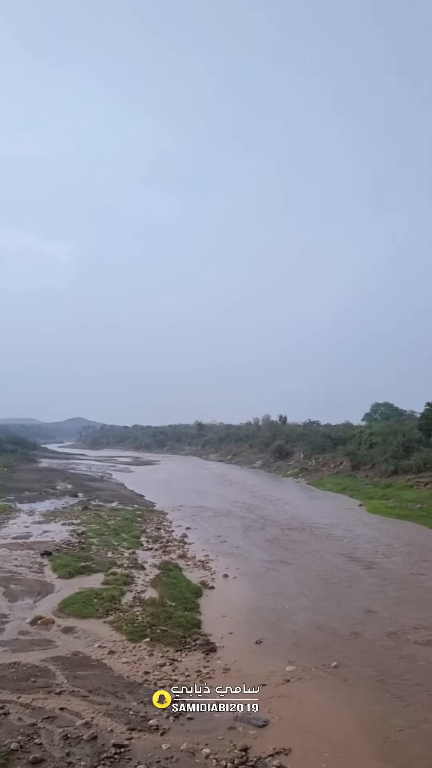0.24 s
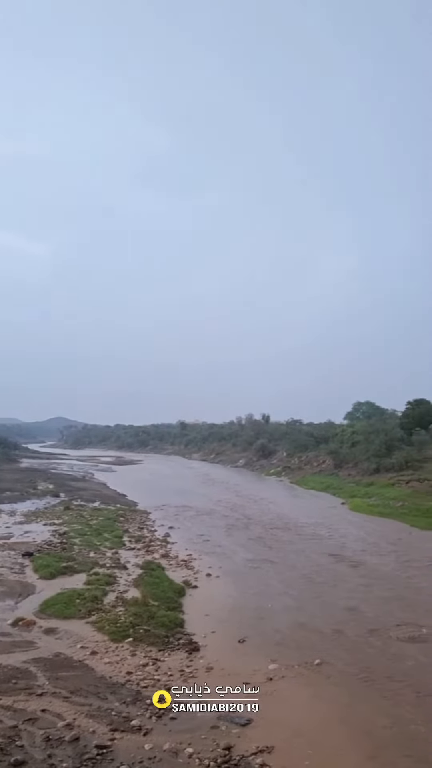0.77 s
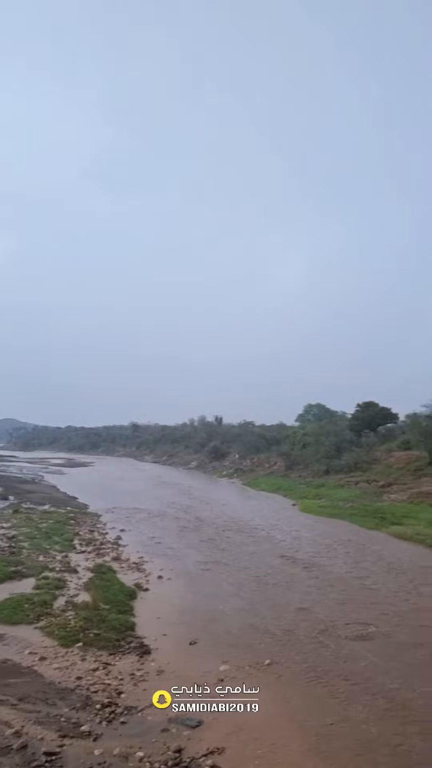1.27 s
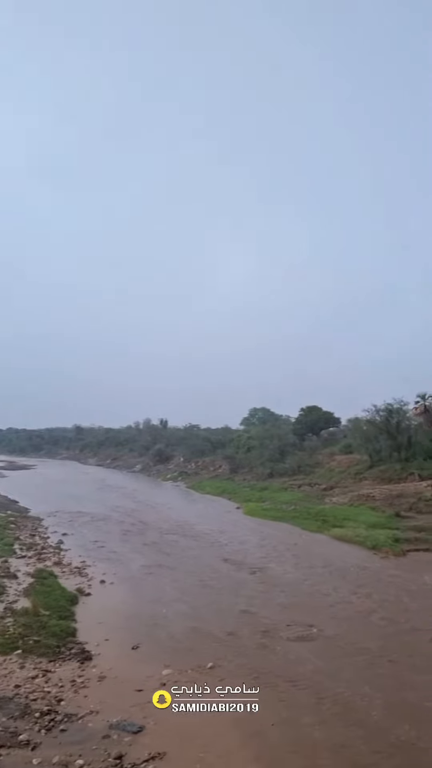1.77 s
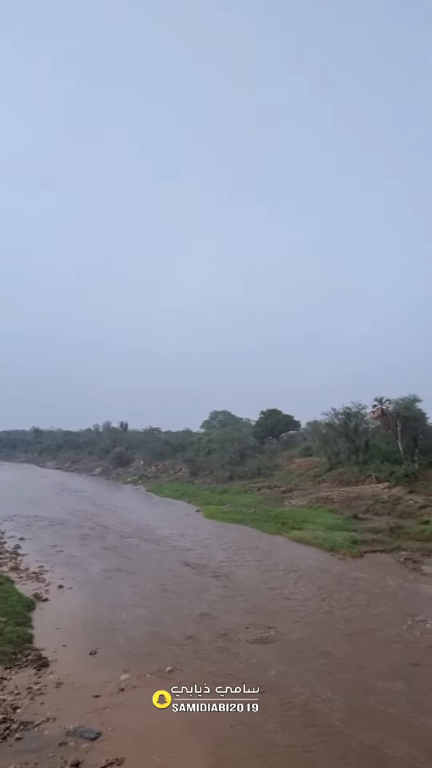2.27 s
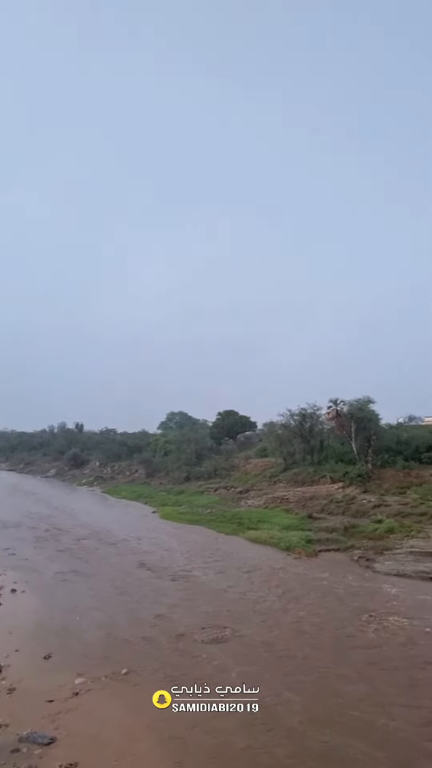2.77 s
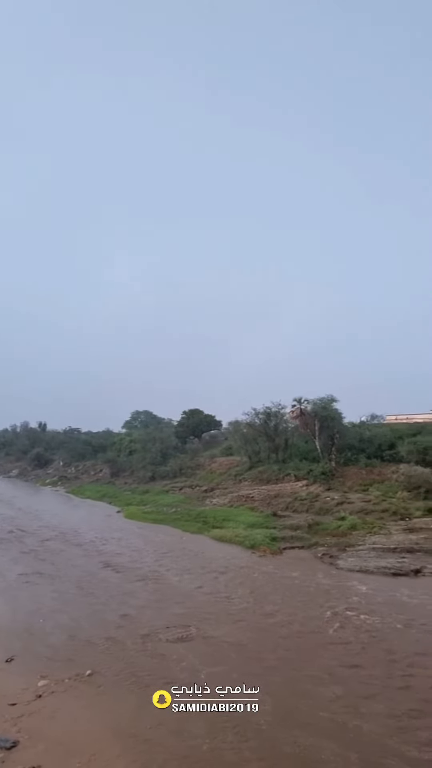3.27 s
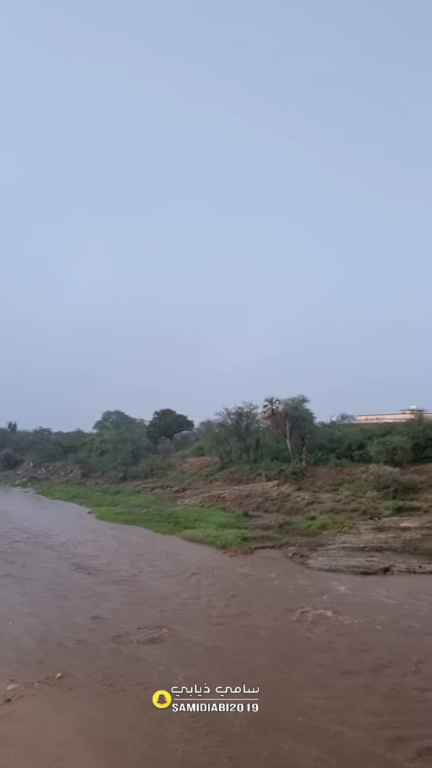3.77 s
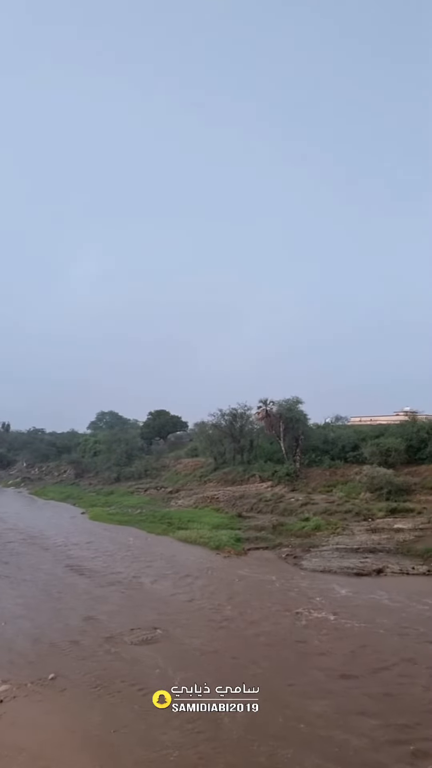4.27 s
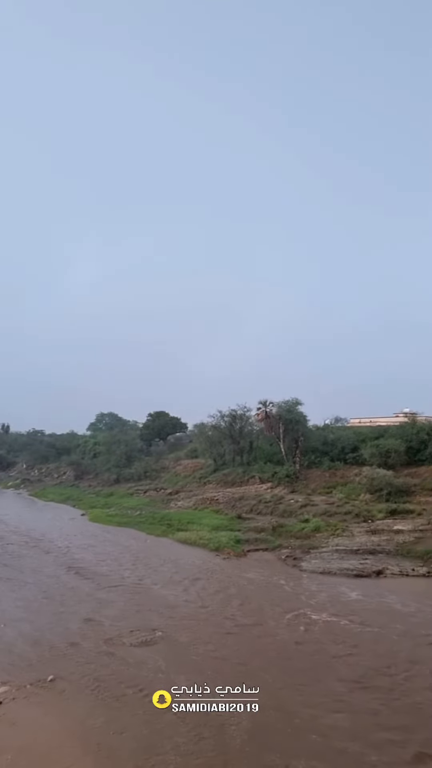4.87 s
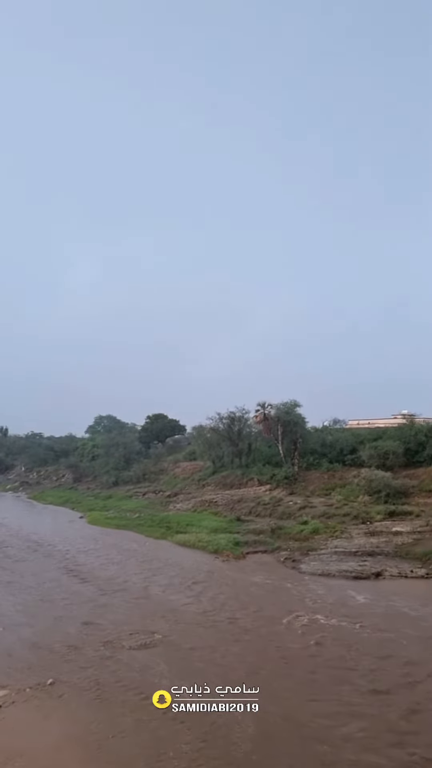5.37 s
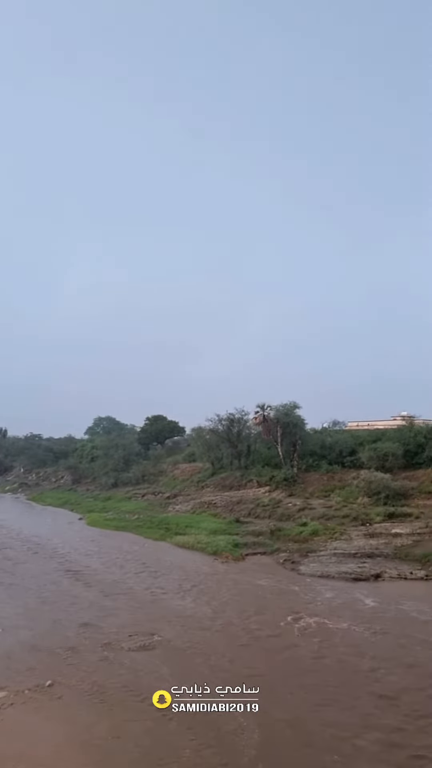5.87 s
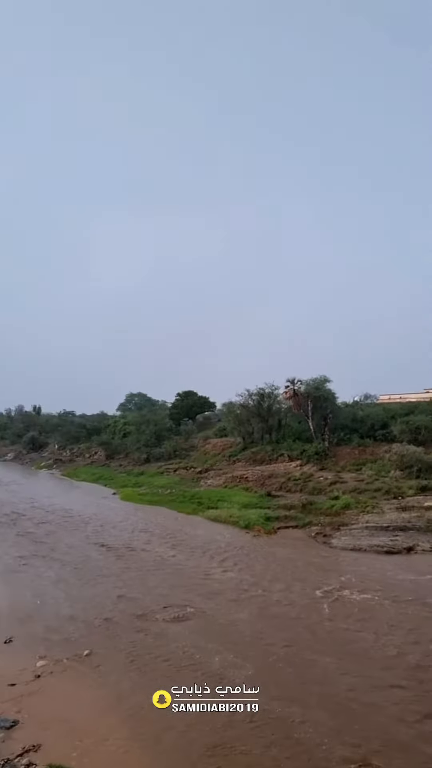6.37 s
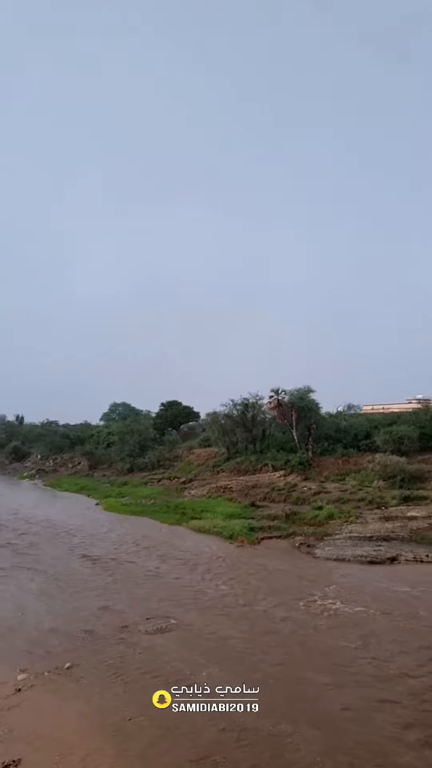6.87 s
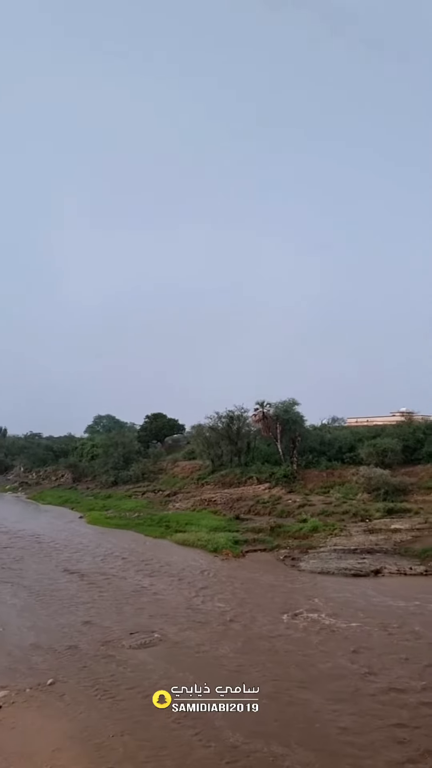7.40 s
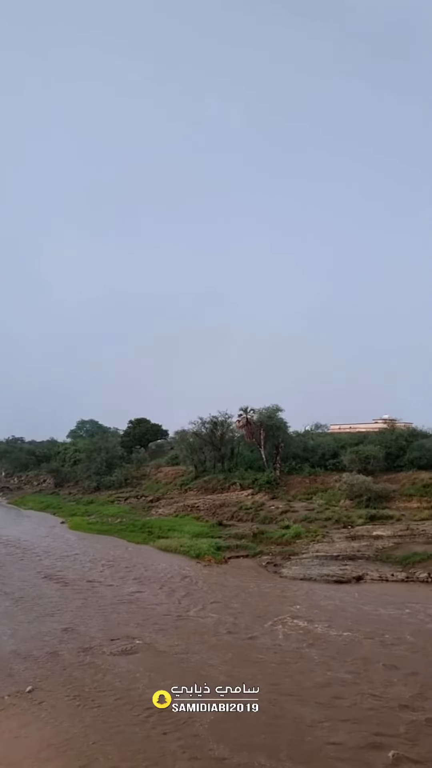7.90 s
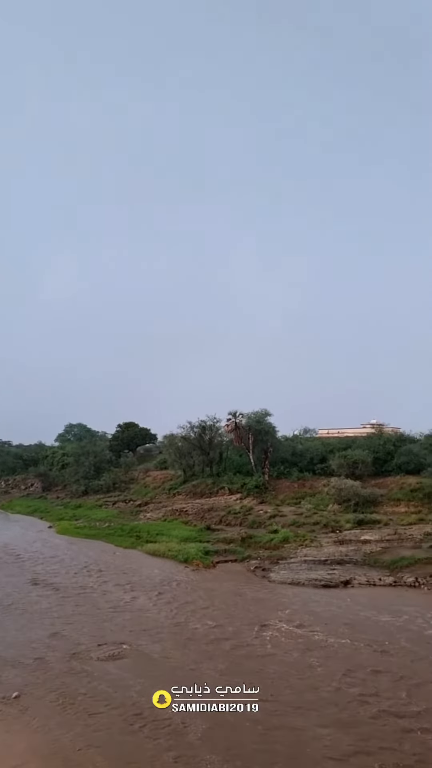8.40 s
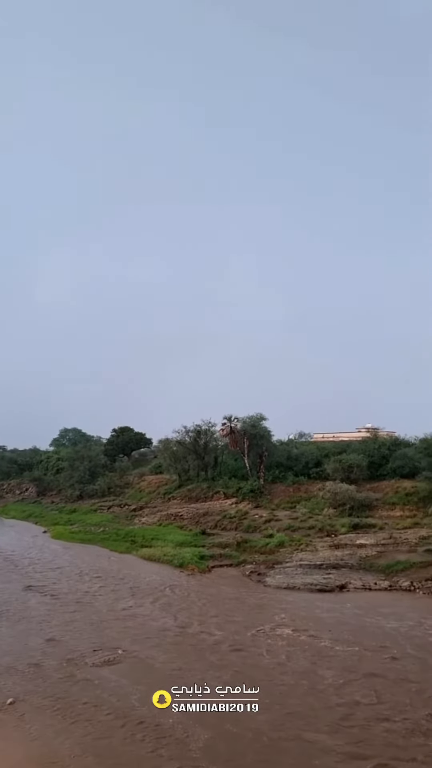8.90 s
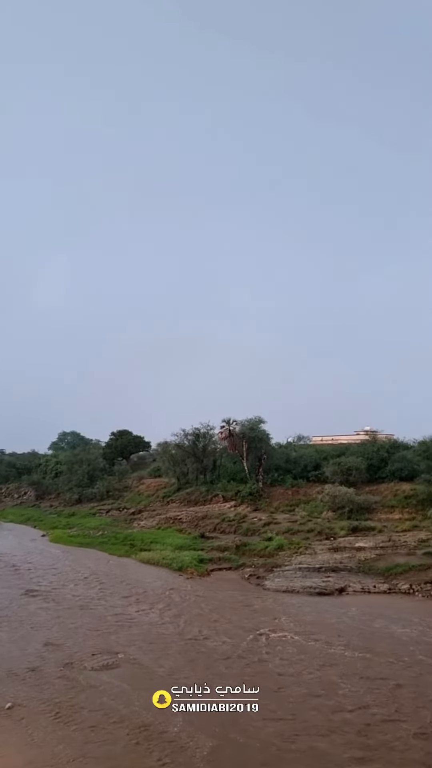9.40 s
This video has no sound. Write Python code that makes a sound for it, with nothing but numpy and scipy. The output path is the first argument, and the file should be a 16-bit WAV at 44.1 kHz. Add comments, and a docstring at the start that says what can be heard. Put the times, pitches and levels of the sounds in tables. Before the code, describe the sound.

Outdoors by a river valley, with a stereo handheld microphone. Light rain hisses softly throughout, with a few close drops ticking. Thunder starts at once as a sharp, uneven tearing crackle. A half-second car horn sounds thinly at about two and a half seconds, then a huge low clap breaks and heavy peals tumble for several seconds. After a small click the thunder drops to a muffled, wavering roll that continues to the end.

```python
"""Thunder over a river valley, at two microphone ports: a tearing crackle, then heavy peals and a long dull roll.
The bent lightning channel sends a dense, uneven train of shock waves; filters give their lengths, and
decaying noise the echoes of the valley sides. Light rain is filtered noise with a fine patter, a few
near drops are decaying sines, and a car horn is a sum of upper partials with rattle and rasp.
One bare click comes late, and the roll changes level and colour there."""
import sys
import numpy as np
from scipy import signal
from scipy.fft import rfft, irfft, next_fast_len
from scipy.io import wavfile
from scipy.ndimage import uniform_filter1d

SR = 44100
rng = np.random.default_rng(int(sys.argv[2]) if len(sys.argv) > 2 else 0)


def log_audio(samples):
    """Write samples as a 16-bit WAV file to the path given in sys.argv[1]."""
    # one column per channel
    frames = np.atleast_2d(samples).T
    # limit to full scale, then quantise
    limited = np.clip(frames, -1, 1)
    pcm = np.round(limited * 32767).astype(np.int16)
    wavfile.write(sys.argv[1], SR, pcm)


N = 425551

# In every spectrum below, levels are relative: only the shape counts, unless noted.

# light rain: f/Hz, level/dB
RAIN_SPECTRUM = [(300, -4.5), (700, -3.5), (1700, -10.5), (2300, -11), (3700, -20.5), (7300, -28),
                 (10600, -36), (13000, -35), (15700, -33.5)]
# loudness of the rain, before its slow fluctuation: t/s, level/dB
RAIN_LEVEL = [(0, -44), (2.4, -44.5), (3.0, -43), (3.4, -51), (4.84, -50), (5.7, -47.5), (9.65, -47.5)]

# near drops: t/s, nominal level/dB, f/Hz, left-right level/dB, cycles to -60 dB
DROPS = [(.354, -20, 6950, -21, 5.8), (2.0542, -42, 6000, 3, 3), (2.2243, -34, 6000, -3, 3),
         (5.1657, -50.5, 8350, -10, 4.5), (6.0514, -29, 6000, 3, 8), (6.142, -40, 5000, -14, 4),
         (6.212, -48, 3770, 9, 53), (6.934, -33, 5400, 1, 4), (7.31, -28, 2100, 0, 6.7),
         (7.945, -45, 4300, 0, 27), (8.201, -34, 2500, 2, 16), (8.636, -47, 8500, -17, 25),
         (8.824, -19, 9000, 5, 5.6), (8.826, -43, 10500, 3, 150)]
DROP_BUILD_S = 0.00023
# the click, a jump that settles exponentially: t/s, jump level/dB, time constant/s
CLICK = (6.0474, -22, .0012)

# horn partials, the low disc's first: relative level/dB, left-right level/dB
HORN_PARTIALS = [(-61, -4), (-45, 2.5), (-41, -10), (-54.5, 7), (-51.5, 4.5), (-55, 7), (-75, 11.5),
                 (-65, 6.5), (-78, -3), (-58, 0), (-65, 0), (-66, 0), (-55.5, 9.5), (-61, 10), (-50.5, -3),
                 (-67.5, -6), (-81, 5), (-60, -1), (-77, -3)]
# which harmonics of the low disc sound: multiple of its fundamental
LOW_DISC_MULTIPLES = [7, 8, 9, 10, 11, 12, 22, 24, 32]
# pitch of the low disc, which sags and recovers: t/s, f/Hz of its 8th partial
LOW_DISC_PITCH = [(2.49, 2566), (2.62, 2559), (2.86, 2558), (3.03, 2568)]
# horn partials of steady pitch, from the higher discs and some of the highest tones: f/Hz
STEADY_PARTIALS_HZ = [2315, 2701, 2766, 3087, 3152, 3472, 7331, 8625, 13730, 15332]
# the partial that fades early as the button lifts: f/Hz, t/s at which its fade starts
EARLY_FADING_PARTIAL = (3838, 2.965)
# buzz of the horn discs: f/Hz, level/dB
RATTLE_SPECTRUM = [(3500, -39.5), (5400, -19.5), (7500, -1.5), (9300, -15.5), (11500, -7), (13700, -8.5),
                   (15800, -6)]
# rasp around the loosest partial, growing and then receding: t/s, relative level/dB
RASP_LEVEL = [(2.5, -67), (2.75, -54), (2.9, -45), (3.0, -54)]
# colour of the rasp: f/Hz, level/dB
RASP_SPECTRUM = [(2450, -24.5), (2750, -8.5), (2890, -1.5), (3050, -7), (3400, -35)]
HORN_ON_S, HORN_OFF_S, HORN_ATTACK_S, HORN_RELEASE_S = 2.474, 3.022, .018, .045
HORN_LAG_S, HORN_TOP_LAG_S = 0.000485, 0.000469   # of the left port; above 9 kHz by another path
HORN_FLUTTER_DB, HORN_FLUTTER_DB_PER_KHZ = 0.5, 0.44
HORN_ECHO_DB, HORN_ECHO_T60_S = -17, 0.25
RATTLE_GROWS_DB, RATTLE_SHARED = 6, .6   # over the blast; gain of the noise common to both ports

# base level of the roll, before and after the click: t/s, deep level/dB, boom level/dB,
# peal level/dB, crackle level/dB
ROLL = [
    [(0, -42, -43.5, -47.5, -51), (.25, -48, -50.5, -49, -56.5), (.6, -44, -49, -43, -38),
     (.9, -46, -46.5, -46.5, -39.5), (1.3, -47.5, -42.5, -42.5, -36), (1.8, -42, -49.5, -44, -45.5),
     (2.3, -51, -36.5, -40, -41.5), (2.65, -43, -38, -44.5, -36), (2.9, -38, -28.5, -39, -56),
     (3.138, -52, -29.5, -43.5, -47), (3.155, -26.5, -14, -22.5, -42.5), (3.6, -26, -21, -27, -47.5),
     (4.3, -21.5, -16.5, -25.5, -43), (5.0, -20.5, -21, -25.5, -53), (5.5, -27, -27, -29.5, -59),
     (6.044, -29.5, -26, -28.5, -67)],
    [(6.048, -32, -32.5, -44.5, -76), (7.0, -33, -26.5, -38.5, -53), (7.5, -36.5, -28, -42.5, -50),
     (7.7, -33, -31.5, -42, -63), (8.0, -38.5, -29.5, -42, -64), (8.4, -32.5, -33.5, -41.5, -64),
     (9.0, -35.5, -26, -39.5, -84), (9.65, -29, -26.5, -39.5, -66)],
]
# swells, as a stretch of the channel faces the listener; negative lifts have no effect:
# t/s of the top, lift level/dB, lift of the crackle level/dB, rise t/s, fall t/s
SWELLS = [(.3, 23, 27.5, 0.22, 0.24), (0.673, 19, 7.5, 0.027, 0.43), (.81, 21, 8, 0.1, 0.091),
          (.985, 13, 13, 0.05, 0.12), (1.14, 12, 12.5, 0.14, 0.13), (1.49, 11, 4, 0.15, 0.42),
          (1.691, 12, 12, 0.012, 0.016), (1.81, 14.5, 15, 0.097, 0.34), (2.0, 15, 16.5, 0.19, 0.24),
          (2.41, -7, 8, 0.026, 0.059), (2.54, -3, 5, 0.078, 0.029), (2.74, 23.5, -4, 0.1, 0.18),
          (3.0, 1, -7, 0.032, 0.08), (3.069, 11.5, 0, 0.16, 0.015), (3.153, 8, 8.5, 0.024, 0.06),
          (3.314, 6.5, 21, 0.017, 0.06), (3.41, 11.5, 18, 0.019, 0.012), (3.523, 8, 13, 0.014, 0.03),
          (3.708, 14.5, 17, 0.086, 0.027), (3.95, 5, 7, 0.046, 0.078), (4.16, 2.5, 6.5, 0.086, 0.018),
          (4.248, 7.5, 6.5, 0.066, 0.0093), (4.4, 4.5, -8, 0.29, 0.14), (4.64, 3, 10, 0.15, 0.13),
          (4.89, 7.5, -2, 0.038, 0.044), (4.98, 5.5, 2.5, 0.072, 0.045), (5.25, -9, 12, .03, 0.073),
          (5.428, 13.5, -1, 0.04, 0.039), (5.689, 13, 5, 0.3, 0.16), (5.82, 11.5, 10, 0.057, 0.052),
          (6.2, 13.5, -2, 0.32, 0.34), (6.719, 10, 2, 0.29, 0.038), (6.809, 12.5, -6, 0.067, 0.04),
          (7.25, 7.5, -2, 0.094, 0.039), (7.339, 12, 1, 0.037, 0.021), (7.65, 14, -1, 0.12, 0.29),
          (8.33, 6, 1, 0.026, 0.24), (8.8, 4.5, -4, 0.034, 0.066), (8.94, 6, 0, 0.077, 0.14),
          (9.3, 6.5, 2, 0.034, 0.037), (9.418, 10, 3, 0.061, 0.035)]
# single claps: t/s, nominal peak of the peal level/dB, base crackle level/dB, ring f/Hz
CLAPS = [(0.167, -20, -29.5, 2320), (0.251, -11, -31, 2560), (0.267, -17, -23.5, 1570),
         (0.286, -7.5, -40, 2140), (0.323, -8, -24, 2120), (0.363, -16, -31, 2460),
         (0.404, -9.5, -29, 2570), (0.543, -14.5, -28.5, 2020), (0.621, -21, -26.5, 1650),
         (0.663, -10, -20, 2070), (0.676, -7, -24.5, 2080), (0.716, -11, -48, 2090),
         (0.746, -21, -26, 2150), (0.765, -10.5, -29, 2150), (0.811, -30, -20.5, 1890),
         (0.848, -50, -24, 2140), (0.866, -41, -28, 2170), (0.944, -28, -23, 2180), (0.954, -24, -18, 2130),
         (0.984, -28, -25, 1780), (0.992, -28, -36, 2300), (1.018, -33, -27, 2170),
         (1.071, -37, -24.5, 2650), (1.105, -20, -25, 2150), (1.122, -14.5, -20, 2120),
         (1.132, -17, -20.5, 2110), (1.145, -35, -23, 2050), (1.157, -21, -45, 2030),
         (1.172, -33, -36, 2200), (1.221, -28, -23, 2190), (1.232, -37, -29, 2200), (1.317, -38, -32, 2250),
         (1.41, -15, -41, 2000), (1.459, -14, -30, 1820), (1.495, -14.5, -44, 1590),
         (1.528, -21, -31, 2200), (1.69, -15, -33, 2140), (1.765, -12, -30, 2260), (1.801, -21, -33, 2100),
         (1.817, -36, -35, 2200), (1.835, -18, -36, 2100), (1.887, -28, -30, 2340), (1.967, -28, -27, 2230),
         (1.99, -20, -34, 1990), (2.034, -32, -27, 1960), (2.079, -22, -38, 2820), (2.263, -56, -42, 2330),
         (2.292, -44, -25.5, 1546), (2.401, -22, -39, 1900), (2.425, -32, -44, 1690),
         (2.524, -9, -36, 2540), (2.579, -34, -35, 1064), (2.644, -31.5, -35, 1090), (2.752, -2, -32, 1560),
         (3.139, 8, -42, 1530), (3.148, 1.5, -33, 1860), (3.235, -9.5, -50, 1800), (3.31, 3, -32, 1680),
         (3.321, -8.5, -37.5, 1810), (3.398, 1.5, -37, 1600), (3.413, -22, -48, 1540),
         (3.435, -19, -48, 1660), (3.457, -1.5, -33.5, 1730), (3.502, -4, -43, 1900),
         (3.511, -10, -48, 1600), (3.695, -5, -43, 1630), (3.706, -11, -31, 1590), (3.793, -4, -35, 1680),
         (4.129, -4.5, -39, 1900), (4.161, -10, -47, 1570), (4.225, -22, -37, 1650),
         (4.247, -18, -45, 1700), (4.571, -15, -41, 1520), (4.589, -2, -27.5, 1570),
         (4.642, -12.5, -38, 1880), (4.66, -10, -36, 1820), (4.975, -5, -34, 1790),
         (5.129, -3.5, -34, 1650), (5.16, -0.5, -46, 1740), (5.239, 6.5, -40, 1930),
         (5.253, -28, -52, 1550), (5.326, -2, -46, 1820), (5.409, -1, -42, 1940), (5.552, -26, -52, 1680),
         (5.737, -1, -56, 1570)]
# longest shocks: f/Hz, level/dB
RUMBLE_SPECTRUM = [(10, -36.5), (22, -26.5), (35, -7.5), (50, -11), (65, 1), (85, 2.5), (110, -27.5),
                   (200, -78)]
# long shocks: f/Hz, level/dB
BOOM_SPECTRUM = [(50, -37), (85, -5.5), (101, 0.5), (135, -2.5), (178, 0), (193, -1.5), (216, -14),
                 (259, -4.5), (320, -18.5), (420, -50), (700, -120)]
# upper body of the long shocks: f/Hz, level/dB
BODY_SPECTRUM = [(170, -38), (250, 0), (310, 2.5), (370, 10), (430, -2), (520, -11.5), (700, -56)]
# base level of the upper body: t/s, level/dB
BODY_LEVEL = [(0, -55), (2.6, -53), (2.7, -43), (3.1, -36.5), (3.16, -28.5), (3.6, -31.5), (4.0, -32),
              (4.8, -38), (5.5, -43.5), (6.04, -32.5), (6.06, -45), (7.7, -48.5), (9.65, -40.5)]
# middle shocks: f/Hz, level/dB
PEAL_SPECTRUM = [(140, -31), (230, -11.5), (259, -15.5), (383, -2), (461, -6), (549, -5), (856, -18.5),
                 (1070, -18.5), (1400, -31), (1800, -41), (2210, -51.5), (3740, -120)]
# short shocks: f/Hz, level/dB
CRACKLE_SPECTRUM = [(400, -35.5), (700, 13), (1000, 16.5), (1400, 6), (2000, -2.5), (2800, 1.5), (3500, -5),
                    (4200, -24.5), (6000, -42.5), (9000, -68)]
# sharp fronts of near shocks: f/Hz, level/dB
EDGE_SPECTRUM = [(2500, -6), (3500, -0.5), (4400, -10.5), (5200, -13.5), (6200, -23), (9000, -60)]
# gain of the sharp fronts against the crackle: t/s, level/dB
NEARNESS = [(0, -6.5), (1.2, -21.5), (1.5, -21), (2.5, -28), (3.2, -17), (4.7, -21), (6, -31.5),
            (9.65, -23.5)]
# snaps in the crackle and at the front of each clap: f/Hz, level/dB
SNAP_SPECTRUM = [(500, -19.5), (900, 2.5), (1400, 3.5), (2100, 4), (2450, -9.5), (2800, -5.5), (3500, -9.5),
                 (4200, -18.5), (5500, -30), (8000, -67.5)]
# lowest shocks of the late roll: f/Hz, level/dB
SHUDDER_SPECTRUM = [(12, -31), (24, 20), (36, 21), (55, 10), (75, -48)]
# two partners of each clap's ring: nominal pitch ratio, mean level/dB
RING_PARTNERS = [(.46, -1.5), (1.331, -14)]
# filter of the valley echo, with its gain kept: f/Hz, level/dB against the direct sound
ECHO_SPECTRUM = [(30, -1.5), (100, -14), (300, -14.5), (800, -2), (2000, 6), (5000, -14.5)]
SHUDDER_DB = -37.5   # before the swells
DEEP_FOLLOWS, PEAL_FOLLOWS = 0.36, 0.5   # share of the swell's lift, against the boom
DEEP_LATE_S = 0.068   # the deepest shocks swell later
CREST_DB = 12.5   # a clap's nominal peak over its rms
BOOM_UNDER_PEAL_DB, BODY_UNDER_PEAL_DB, RING_OVER_CRACKLE_DB = 1.5, 6, 13   # parts of a clap
CLAP_BUILD_S, RING_BUILD_S = 0.0026, .0055
CLAP_EDGE_DB = 5   # a clap's sharp front over its crackle, before the nearness
SNAPS_PER_S, SNAPS_END_S = 700, 2.6   # nominal rate; loose snaps belong to the early tearing
SNAP_DB, FRONT_OVER_CRACKLE_DB = -12, 13.5   # against the crackle; the front is one click
CRACKLE_PAN_DB = -5   # left-right, of rings and snaps

# shading by the body, shared out at about two thirds to each port: f/Hz, left-right level/dB
PORT_SHADING = [(60, -1), (110, 1), (200, -2.5), (380, 2), (700, 4), (1290, 0.5), (2380, 1.5), (4400, 2),
                (8120, 1.5), (15000, 1)]
CUTOFF_HZ = 15900
SIDES = np.array([[.5], [-.5]])   # shares a left-right difference between the ports


def from_db(db):
    """Amplitude ratio: 20 dB is a factor of ten."""
    return 10 ** (np.asarray(db) / 20)


def rms_one(x):
    """Normalisation of power: the signal is scaled to rms 1."""
    return x / np.sqrt(np.mean(x ** 2) + 1e-20)


def in_time(rows):
    """Linear interpolation: each column of a curve becomes one value per sample."""
    s, *columns = np.transpose(rows)
    return [np.interp(np.arange(N) / SR, s, c) for c in columns]


def at_hz(points, hz):
    """Logarithmic frequency axis: levels are interpolated along it."""
    point_hz, level_db = np.transpose(points)
    return np.interp(np.log(hz + 1), np.log(point_hz), level_db)


def colour(x, spectrum, scale=1, unit=False):
    """Minimum phase: folding the cepstrum gives a causal filter with the given spectrum."""
    size = 8192
    hz = np.arange(size // 2 + 1) * SR / size
    cepstrum = irfft(scale * at_hz(spectrum, hz) * np.log(10) / 20)
    cepstrum[1:size // 2] *= 2
    cepstrum[size // 2 + 1:] = 0
    response = irfft(np.exp(rfft(cepstrum)))
    if unit:   # white input keeps its power
        response /= np.sqrt(np.sum(response ** 2))
    response = response.reshape((1,) * (x.ndim - 1) + (-1,))
    return signal.oaconvolve(x, response, axes=-1)[..., :N]


def later(x, lag_s):
    """Path difference: a linear phase slope delays the sound, even by part of a sample."""
    size = next_fast_len(N + 64)
    cycles_per_sample = np.arange(size // 2 + 1) / size
    return irfft(rfft(x, size) * np.exp(-2j * np.pi * lag_s * SR * cycles_per_sample), size)[:N]


def drift(pole_hz):
    """Random fluctuation: noise through a double-pole low-pass, of rms 1."""
    step = 40   # samples between computed values
    r = np.exp(-2 * np.pi * pole_hz * step / SR)
    slow = signal.lfilter([1], [1, -2 * r, r * r], rng.standard_normal(N // step + 2002))[2000:]
    return np.interp(np.arange(N) / step, np.arange(len(slow)), rms_one(slow))


def grains(per_s, spread_db):
    """Random point process: clicks of uneven size and sign, scaled to rms 1."""
    sizes = from_db(spread_db * np.minimum(rng.exponential(1, N), 4))
    signed = sizes * rng.choice([-1, 1], N)
    return rms_one(signed * (rng.random(N) < per_s / SR))


def rain():
    """Superposition of impacts: far rain is hiss, nearer drops a patter, mostly each port's own."""
    level_db, = in_time(RAIN_LEVEL)
    shared = rng.standard_normal(N)
    ports = []
    for port in range(2):
        hiss = rng.standard_normal(N) + 0.13 * shared
        patter = from_db(-3.0) * grains(1200, spread_db=4.0)
        ports.append(colour(hiss + patter, RAIN_SPECTRUM))
    return from_db(level_db + 0.72 * drift(12.0)) * rms_one(np.array(ports))


def near_drops():
    """Damped oscillation: each drop builds up at its own pitch and decays exponentially."""
    out, t = np.zeros((2, N + 900)), np.arange(900) / SR
    for s, db, ring_hz, pan_db, cycles in DROPS:
        at = int(s * SR)
        decay = from_db(-60 * t * ring_hz / cycles)
        drop = np.sin(2 * np.pi * ring_hz * t) * decay * (1 - np.exp(-t / DROP_BUILD_S))
        out[:, at:at + 900] += from_db(db + pan_db * SIDES) * drop
    return out[:, :N]


def bare_click():
    """Step and relaxation: one negative jump, equal at both ports, settles exponentially."""
    s, jump_db, settle_s = CLICK
    out, t, at = np.zeros((2, N)), np.arange(900) / SR, int(s * SR)
    out[:, at:at + 900] -= from_db(jump_db) * np.exp(-t / settle_s)
    return out


def horn_partials(on):
    """Harmonic series: of discs near 320 and 390 Hz only upper partials carry, the highest unsteadily."""
    t, out = np.arange(N)[on] / SR, 0
    wavering = t + 3e-5 * drift(28)[on]   # the contact breaker is slightly uneven
    pitch = in_time(LOW_DISC_PITCH)[0][on]
    low_hz = np.mean(pitch) / 8
    sagging = wavering + np.cumsum(pitch / np.mean(pitch) - 1) / SR
    partials = [(k * low_hz, sagging) for k in LOW_DISC_MULTIPLES]
    partials += [(hz, wavering) for hz in STEADY_PARTIALS_HZ]
    fading_hz, fade_s = EARLY_FADING_PARTIAL
    for (hz, clock), (db, pan_db) in zip(partials, HORN_PARTIALS):
        chance = np.interp(t, np.linspace(t[0], t[-1], num=36), rng.standard_normal(36))
        flutter_db = (HORN_FLUTTER_DB + HORN_FLUTTER_DB_PER_KHZ * hz / 1000) * chance
        if abs(hz / fading_hz - 1) < .05:
            flutter_db -= np.clip((t - fade_s) * 500, 0, 12)
        # the whole left port is delayed afterwards; the highest partials need a little less
        lead_s = (HORN_LAG_S - HORN_TOP_LAG_S) * (hz > 9000)
        cycles = hz * (clock + [[lead_s], [0]]) + rng.random()
        out = out + from_db(db + np.array([[pan_db], [0]]) + flutter_db) * np.sin(2 * np.pi * cycles)
    return out


def car_horn():
    """Forced vibration: discs sound, rattle and rasp, at the right port first; the valley echoes them."""
    t, out = np.arange(N) / SR, np.zeros((2, N))
    off_s = HORN_OFF_S + HORN_RELEASE_S
    on = slice(int(HORN_ON_S * SR), int(off_s * SR))
    out[:, on] = horn_partials(on)
    rattle = RATTLE_SHARED * rng.standard_normal(N) + rng.standard_normal((2, N))
    growth = from_db(np.interp(t, [HORN_ON_S, off_s], [-RATTLE_GROWS_DB, 0]))
    out += from_db([[-54], [-57]]) * growth * colour(rattle, RATTLE_SPECTRUM, unit=True)
    out += from_db(in_time(RASP_LEVEL)[0]) * colour(rng.standard_normal(N), RASP_SPECTRUM, unit=True)
    blast_s = [HORN_ON_S, HORN_ON_S + HORN_ATTACK_S, HORN_OFF_S, off_s]
    out *= from_db(np.interp(t, blast_s, [-60, 2.5, 4.5, -60.5]))
    tail = rng.standard_normal((2, SR // 4)) * from_db(-60 * t[:SR // 4] / HORN_ECHO_T60_S)
    tail *= from_db(HORN_ECHO_DB) / np.sqrt(np.sum(tail ** 2, axis=1, keepdims=True))
    echo = signal.oaconvolve(out, tail, axes=1)[:, :N]
    return np.array([later(out[0], HORN_LAG_S), out[1]]) + echo


def swelling():
    """Directivity of the channel: lifts in dB, of roll and crackle, climb to each top and fall back."""
    lifts_db = np.zeros((2, N))
    for s, db, crackle_db, rise_s, fall_s in SWELLS:
        on = slice(int((s - rise_s) * SR), int((s + fall_s) * SR))
        shape = np.interp(np.arange(on.start, on.stop) / SR, [s - rise_s, s, s + fall_s], [0, 1, 0])
        lifts_db[:, on] = np.maximum(lifts_db[:, on], np.outer([db, crackle_db], shape))
    return lifts_db


def clap_envelope(db, t60):
    """Exponential build-up and decay: each clap rises within milliseconds and dies away."""
    hits, build = np.zeros(N), np.exp(-1 / (CLAP_BUILD_S * SR))
    hits[(np.array(CLAPS)[:, 0] * SR).astype(int)] = from_db(db)
    decaying = signal.lfilter([1], [1, -from_db(-60 / (t60 * SR))], hits)
    return signal.lfilter([1 - build], [1, -build], decaying)


def clap_rings(db, pitches_hz, cycles):
    """Damped resonance: each clap's crackle rings raggedly around its own pitch and two partners."""
    out, t = np.zeros(N + 1500), np.arange(1500) / SR
    ragged = uniform_filter1d(rng.standard_normal((len(db), 3, 1500)), size=90, axis=2) * np.sqrt(90)
    chance = rng.standard_normal((len(db), 3))
    ratios, partner_db = np.transpose([(1, 0)] + RING_PARTNERS)
    for (s, *rest), level_db, hz, rag, c in zip(CLAPS, db, pitches_hz, ragged, chance):
        at = int(s * SR)
        detuned = ratios * (1 + .04 * c * (ratios != 1))   # the partners only
        gains = from_db(partner_db + 1.9 * c)[:, None] * (1 + 0.21 * rag)
        tones = gains * np.sin(2 * np.pi * np.outer(detuned, hz * t))
        envelope = from_db(level_db - 60 * t * hz / cycles) * (1 - np.exp(-t / RING_BUILD_S)) ** 2
        out[at:at + 1500] += envelope * tones.sum(axis=0)
    return out[:N]


def scattered(shocks, pitches_hz, sharpness):
    """Scattering by turbulence and ground: shocks are dealt to short resonances, each its own colour."""
    dealt, out = rng.integers(0, len(pitches_hz), N), 0
    for k, hz in enumerate(pitches_hz):
        r = np.exp(-np.pi * hz / sharpness / SR)
        poles = [1, -2 * r * np.cos(2 * np.pi * hz / SR), r * r]
        share = shocks * (dealt == k) + 1e-18
        out = out + signal.lfilter([1, 0, -1], poles, share) * (1 - r * r) / 2
    return out * np.sqrt(len(pitches_hz))


def from_the_left(shocks, swell, spectrum, lag_s, echo_t60):
    """Arrival delay and reverberation: the left port leads; each port's own echoes trail the swell."""
    direct = shocks * swell
    fade = from_db(-120 / (echo_t60 * SR))   # of power, per sample
    trailing_power = []
    for part in np.split(direct ** 2 + 1e-18, [int(CLICK[0] * SR)]):   # no echo carries over the click
        smoothed, _ = signal.lfilter([1 - fade], [1, -fade], part, zi=[np.mean(part[:2000])])
        trailing_power.append(smoothed)
    trailing = np.sqrt(np.concatenate(trailing_power))
    echoes = colour(trailing * rng.standard_normal((2, N)), ECHO_SPECTRUM)
    return colour(np.array([direct, later(direct, lag_s)]) + echoes, spectrum, unit=True)


def thunder():
    """Shock waves from a bent channel: one uneven train, heard at several lengths, swells and claps."""
    deep_db, boom_db, peal_db, crackle_db = in_time(np.vstack(ROLL))
    lift_db, crackle_lift_db = swelling()
    s, clap_db, clap_crackle_db, clap_hz = np.transpose(CLAPS)
    t = np.arange(N) / SR

    shocks = grains(2500 * from_db(2.3 * drift(25)), spread_db=3.0)
    more_shocks = grains(1000 * from_db(3.1 * drift(30)), spread_db=3.0)
    coloured = scattered(more_shocks, np.geomspace(300, 6000, num=26), sharpness=24.0)
    shocks[((s + CLAP_BUILD_S) * SR).astype(int)] = 10.6   # a strong front leads every clap

    # levels of the roll and its claps, from the deepest shocks to the sharpest
    bunching = drift(28.5)
    late_db = np.interp(np.arange(N) - DEEP_LATE_S * SR, np.arange(N), lift_db)
    clap_rms_db = clap_db - CREST_DB
    shudder = from_db(SHUDDER_DB + 0.5 * late_db) * (np.arange(N) > CLICK[0] * SR)
    deep = from_db(deep_db + DEEP_FOLLOWS * late_db)
    boom = from_db(boom_db + lift_db + 1.63 * bunching)
    boom += clap_envelope(clap_rms_db - BOOM_UNDER_PEAL_DB, 0.036)
    body = from_db(in_time(BODY_LEVEL)[0] + 0.43 * lift_db + 2.4 * bunching)
    body += clap_envelope(clap_rms_db - BODY_UNDER_PEAL_DB, 0.046)
    peal = from_db(peal_db + PEAL_FOLLOWS * lift_db + 0.12 * bunching)
    peal += clap_envelope(clap_rms_db, 0.028)
    tearing = from_db(crackle_db + crackle_lift_db + 3.0 * bunching)
    crackle = tearing + clap_envelope(clap_crackle_db, 0.014)
    edge = tearing + clap_envelope(clap_crackle_db + CLAP_EDGE_DB, 0.056)
    edge *= from_db(in_time(NEARNESS)[0])

    rings = clap_rings(clap_crackle_db + RING_OVER_CRACKLE_DB, clap_hz, cycles=59.0)
    loose = grains(SNAPS_PER_S * from_db(4 * drift(20)), spread_db=3.0)
    snaps = scattered(loose, np.geomspace(750, 4500, num=14), sharpness=6.0)
    snaps = snaps * tearing * from_db(SNAP_DB) * (t < SNAPS_END_S)
    snaps[((s + RING_BUILD_S) * SR).astype(int)] += from_db(clap_crackle_db + FRONT_OVER_CRACKLE_DB)
    leaning = from_db(CRACKLE_PAN_DB * SIDES)

    out = from_the_left(shocks, shudder, SHUDDER_SPECTRUM, 0.00057, echo_t60=0.92)
    out += from_the_left(shocks, deep, RUMBLE_SPECTRUM, 0.00025, echo_t60=.6)
    out += from_the_left(shocks, boom, BOOM_SPECTRUM, 0.000093, echo_t60=.25)
    out += from_the_left(shocks, body, BODY_SPECTRUM, 0.000307, echo_t60=0.15)
    out += from_the_left(0.92 * shocks + 1.09 * coloured, peal, PEAL_SPECTRUM, 0.00044, echo_t60=0.24)
    out += from_the_left(0.37 * shocks + 0.37 * coloured, crackle, CRACKLE_SPECTRUM, 0.00044, echo_t60=0.064)
    out += from_the_left(0.5 * shocks + 0.2 * coloured, edge, EDGE_SPECTRUM, 0.000447, echo_t60=0.083)
    out += colour(np.array([snaps, later(snaps, 0.000399)]), SNAP_SPECTRUM, unit=True) * leaning
    out += np.array([rings, later(rings, 0.00037)]) * leaning
    return out


def scene():
    """Superposition: the pressures of all sources add at the two ports."""
    return rain() + near_drops() + bare_click() + car_horn() + thunder()


def record(dry):
    """Shading and saturation: the body shades the ports unevenly, peaks are rounded, the top is cut."""
    ports = np.array([colour(dry[0], PORT_SHADING, 0.67), colour(dry[1], PORT_SHADING, -0.69)])
    rounded = 1.062 * np.tanh(ports / 1.093)
    cut = signal.cheby2(24, 70, CUTOFF_HZ, fs=SR, output="sos")
    return signal.sosfilt(cut, rounded)


dry = scene()
out = record(dry)
log_audio(out)
```